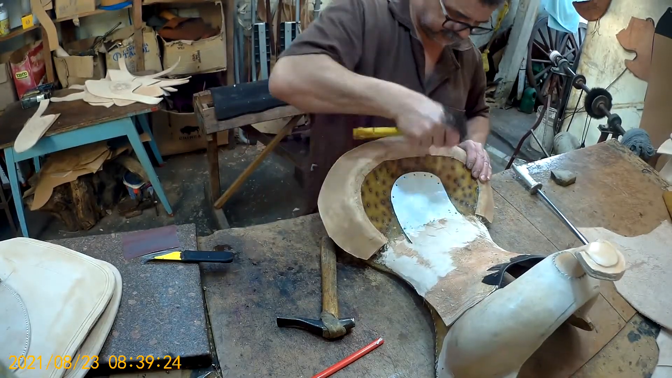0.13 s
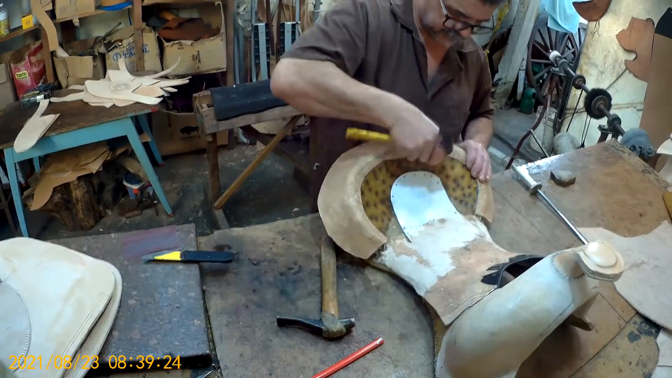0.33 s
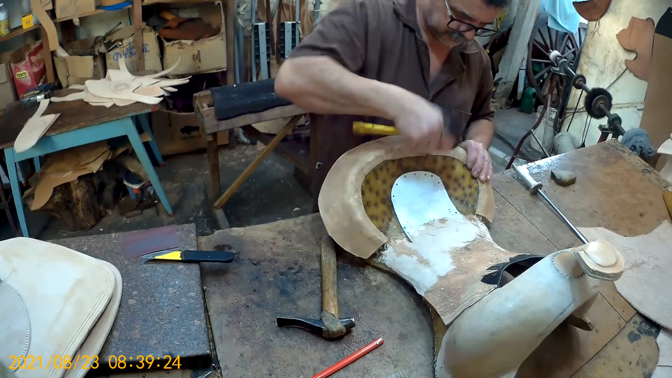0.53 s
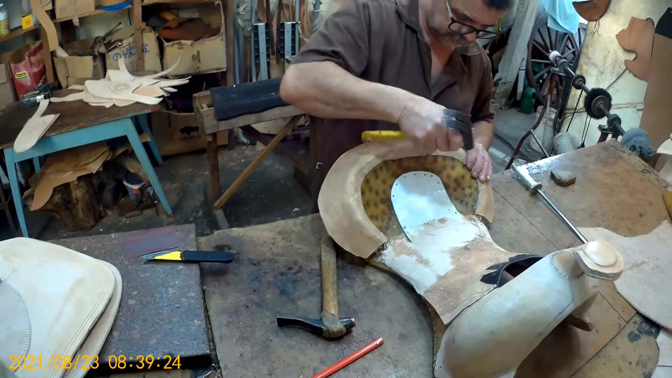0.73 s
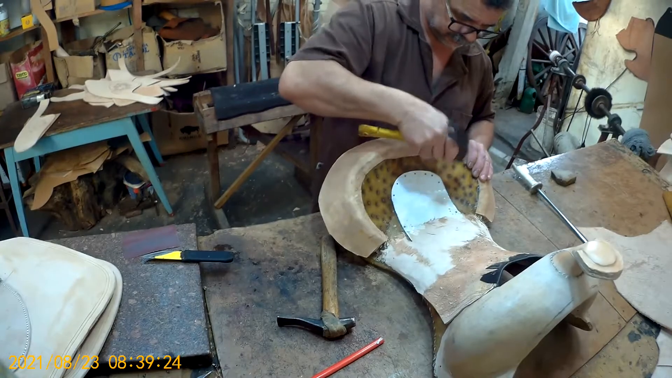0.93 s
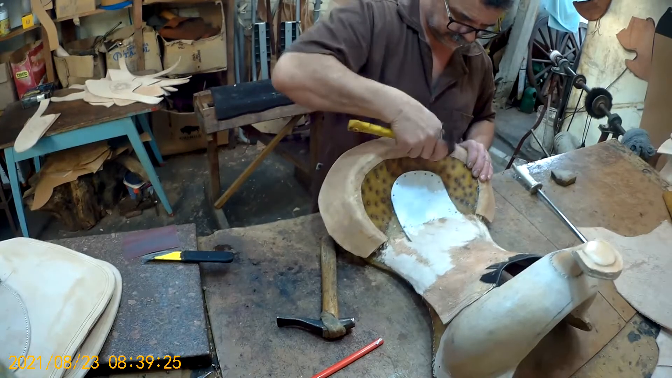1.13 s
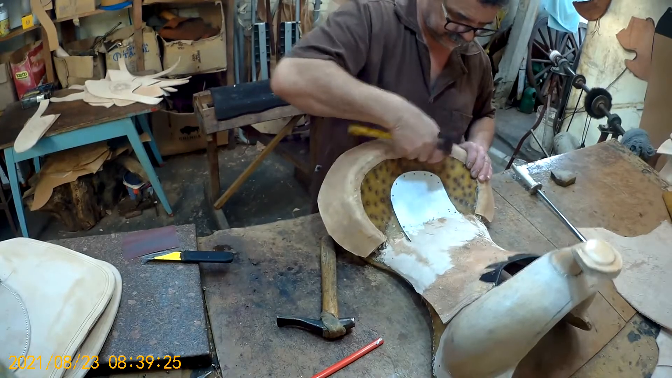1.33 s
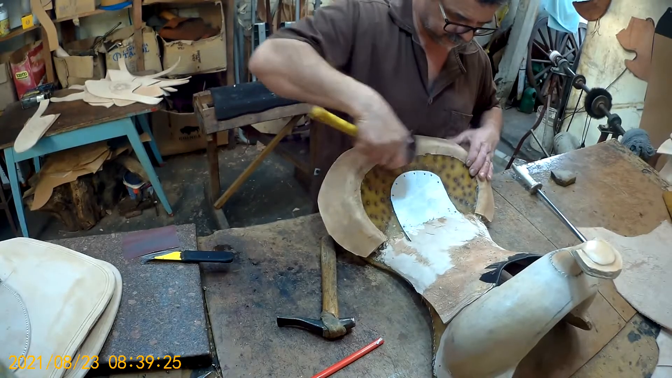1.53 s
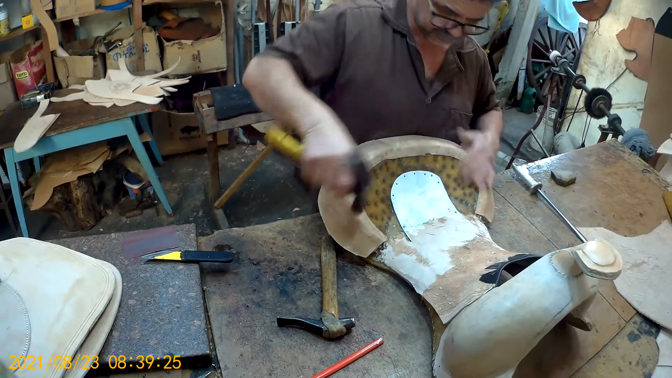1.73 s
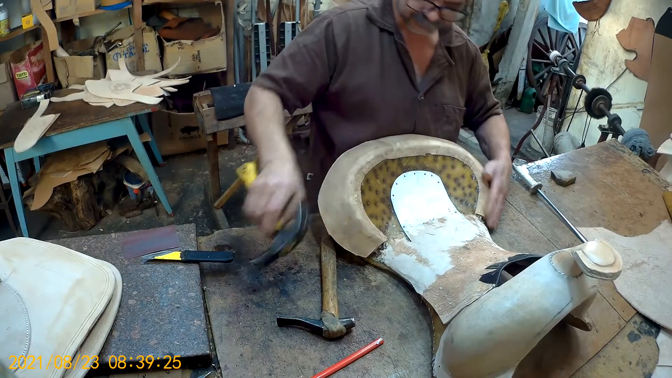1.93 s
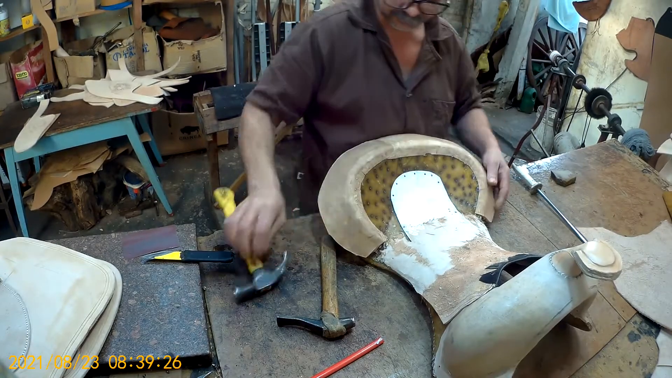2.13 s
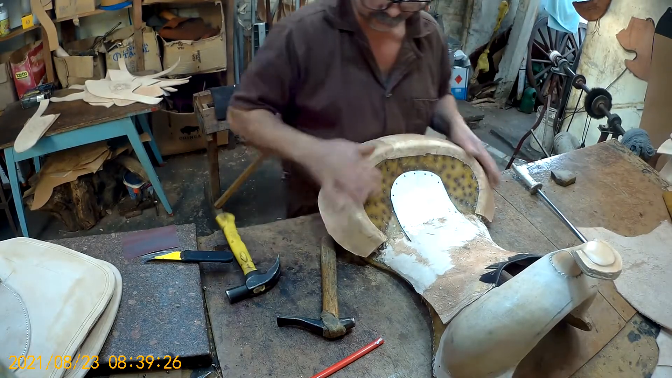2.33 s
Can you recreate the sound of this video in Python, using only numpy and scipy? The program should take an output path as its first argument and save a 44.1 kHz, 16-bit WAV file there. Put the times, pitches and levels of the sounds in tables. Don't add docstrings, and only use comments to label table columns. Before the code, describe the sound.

A small steel hammer gives five hard, woody knocks on a leather-covered saddle, scrapes off the rim, then after a brief cloth rustle drops and rattles on a workbench; small workshop, close overloaded microphone.

```python
import sys
import numpy as np
from scipy import signal
from scipy.fft import rfft, irfft
from scipy.io import wavfile
from scipy.ndimage import uniform_filter1d, minimum_filter1d

SR = 44100
rng = np.random.default_rng(int(sys.argv[2]) if len(sys.argv) > 2 else 0)


def how_loud(loudness_db):
    steps = np.asarray(loudness_db, float) / 20
    return 10 ** steps


def store_wav(level_fs):
    pcm = np.round(np.clip(np.atleast_2d(level_fs), -1, 1) * 32767)
    wavfile.write(sys.argv[1], SR, pcm.T.astype(np.int16))


N = 110250

# frequency in Hz, density in dB per Hz.
AIR_SPECTRUM = [(15, -50), (25, -4), (70, -4.5), (223, -5.5), (301, -8), (344, -7), (2480, -19.5),
                (13200, -31), (16000, -33)]
# start in seconds, peak in dB, thump in dB, brightness in dB,
# pitch factor of the steel.
BLOWS = [
    (0.2067, 2, 1.5, 6, 1.25),
    (0.4841, 2.5, 1, 4, 1.2),
    (0.7334, 1, 2, 8.5, 1.04),
    (0.9757, 1.5, -2.5, 7, 1.04),
    (1.223, 1, -0.5, -0.5, 1.3),
]
# frequency in Hz, level in dB, t60 in seconds, rise in seconds.
SADDLE_MODES = [(51, -13, 0.44, .05), (76.5, -13.5, 0.55, 0.019), (115.8, 6.5, 0.28, 0.02),
                (127, 4.5, 0.14, 0.043), (248.5, 14.5, 0.072, 0.013), (394.5, 7, 0.1, 0.00062),
                (503, -2.5, 0.13, 0.0026), (689.1, 10.5, 0.13, 0.0056), (730.4, 10, 0.13, 0.0017),
                (799, -1, 0.18, 0.0045), (917.4, 32, 0.0074, 0.001), (1006, -11, 0.43, 0.0034),
                (1477, 7, 0.02, 0.00046), (1825, -8, 0.033, 0.0019)]
SADDLE_SWING = [1, 1, 1, 1, 1, 1, -1, 1, 1, -1, 1, 1, 1, 1]
# frequency in Hz, density in dB per Hz.
SADDLE_TAIL = [(30, -15), (60, -2.5), (110, -4), (190, -8), (270, -6), (450, -7.5), (590, -15), (720, -8.5),
               (1300, -19.5), (2100, -29.5), (6000, -46), (12000, -75)]
# frequency in Hz, density in dB per Hz.
STEEL_SPECTRUM = [(1150, -22), (2820, 6), (3200, 5), (4550, 3), (5300, -10), (6500, -5.5), (8300, -7),
                  (16000, -46)]
# frequency in Hz, t60 in seconds.
ROOM_DECAY = [(50, 0.13), (160, 0.36), (420, 0.37), (1100, 0.48), (2000, 0.3), (3500, 0.17), (8000, 0.11)]
# frequency in Hz, level in dB, t60 in seconds,
# rise in seconds.
RETURN_MODES = [(710, -1, 0.13, 0.021), (687, -13.5, 0.089, .03)]
# time in seconds, level in dB.
SLEEVE_MOVES = [(1.4, -89), (1.5, -45), (1.56, -43), (1.62, -55), (1.66, -47), (1.72, -39), (1.8, -44),
                (1.87, -49.5), (2.0, -58), (2.25, -38.5), (2.349, -38.5), (2.5, -47.5)]
# frequency in Hz, density in dB per Hz.
CLOTH_SPECTRUM = [(300, -26), (1000, 12.5), (2500, 9), (4200, 5.5), (5500, -28), (6800, 1), (8300, -6.5),
                  (15000, -14)]
# time in seconds, level in dB.
PALM_SLIDES = [(1.44, -80), (1.48, -58), (1.555, -53), (1.6, -72), (1.68, -54), (1.76, -69), (1.9, -88),
               (2.02, -45), (2.1, -68)]
# start in seconds, peak in dB.
SKIPS = [(1.472, 3.5), (1.479, -7), (1.488, -6), (1.495, -6), (1.501, -1), (1.511, -1.5), (1.515, -3),
         (1.524, -12), (1.532, -12), (1.5366, -1), (1.548, -10), (1.555, -13), (1.567, -15), (1.981, -16)]
# frequency in Hz, level in dB, t60 in seconds, rise in seconds.
RIM_MODES = [(110.8, -18, 0.36, 0.019), (316, -44, 0.11, 0.0028), (502, 4, 0.013, 0.0011),
             (977, -15.5, 0.17, 0.00052), (1098, -2, 0.032, 0.00054), (1336, -4.5, 0.016, 0.00064),
             (2230, -27, 0.09, 0.00072)]
# start in seconds, length in seconds, level in dB, fade in dB.
DRAGS = [
    (1.473, 0.091, -23, -7),
    (2, 0.049, -11, -10),
]
# frequency in Hz, density in dB per Hz.
SCUFF_SPECTRUM = [(60, 0), (300, 8.5), (600, 7), (1000, -7), (1500, -2.5), (2300, -20.5), (3500, -39),
                  (12000, -27.5)]
# start in seconds, peak in dB, thump in dB, brightness in dB,
# pitch factor of the spot.
DROPS = [
    (1.993, 1, 10, -1.5, 0.82),
    (2.0755, 6.5, 17, 5.5, 1.004),
    (2.0925, 9.5, 1, 7, 1.015),
    (2.1378, -0.5, 1, -25, 1.2),
    (2.1418, -1.5, -19, -27, 1.65),
    (2.152, 8, 13.5, 5, 1.02),
    (2.194, 3, 4, -0.5, 1.05),
    (2.296, -4.5, -6, -4, 1.1),
    (2.372, -16, 8, -3, 1.16),
]
# frequency in Hz, level in dB, t60 in seconds, rise in seconds.
BENCH_MODES = [(150, -1, 0.043, 0.0044), (273.4, -4, 0.15, 0.0078), (347, 5.5, 0.05, 0.0021),
               (452.5, -11, 0.16, 0.0062), (556, 4.5, 0.038, 0.0017), (674, 7, 0.05, 0.0019),
               (769, 6.5, 0.039, 0.00064), (823, -5, 0.082, 0.00071), (837, 15, 0.02, 0.00052),
               (1006, -1.5, 0.11, 0.001), (1146, 6, 0.031, 0.0006), (1375, 10, 0.021, 0.00052),
               (2414, 1, 0.012, 0.00051), (3850, -4.5, 0.0079, 0.00032)]
# frequency in Hz, density in dB per Hz.
BENCH_TAIL = [(18, -46), (30, -18), (333, -5), (407, -17), (930, -8.5), (1030, -9.5), (2800, -26),
              (6740, -38.5), (12000, -47), (15600, -63), (22000, -120)]
# start in seconds, level in dB, thump in dB.
LANDINGS = [
    (1.993, -0.5, 18),
    (2.154, -9, 16),
]
# frequency in Hz, level in dB, t60 in seconds, rise in seconds.
LANDING_MODES = [(338.2, 2.5, 0.094, .008), (527, 7.5, 0.032, 0.00073), (670, 9.5, 0.026, 0.0017),
                 (866, -6.5, 0.25, 0.005), (1030, -2, 0.19, 0.0038), (1146, -6, 0.34, 0.018),
                 (1222, -1, 0.11, 0.002)]
# start in seconds, length in seconds, lower edge in Hz, loss in dB.
TREBLE_LOSSES = [(.2, .033, 8700, -15), (.458, .06, 8700, -15), (.471, .011, 1800, -20),
                 (.712, .026, 8700, -15), (.955, .045, 8700, -15), (1.193, .045, 8700, -15),
                 (1.268, .016, 4500, -12), (1.448, .028, 8700, -35), (1.477, .011, 3900, -25),
                 (1.587, .027, 4300, -25), (1.757, .011, 5500, -16), (1.99, .095, 8700, -35),
                 (2.032, .014, 3500, -14), (2.15, .032, 8700, -28), (2.278, .032, 8700, -35),
                 (2.374, .012, 4300, -15)]

DETUNE = 0.0044


def evened(x):
    return x / np.sqrt(np.mean(x ** 2) + 1e-20)


def read(points, hz):
    f, value = np.transpose(points)
    return np.interp(np.log(hz + 1), np.log(f + 1), value)


def add(mix, s, sound):
    part = mix[round(s * SR):][:len(sound)]
    part += sound[:len(part)]


def coloured(x, spectrum):
    hz = np.fft.rfftfreq(len(x), 1 / SR)
    return irfft(rfft(x) * how_loud(read(spectrum, hz)), len(x))


def slow_noise(length, smooth):
    return evened(uniform_filter1d(rng.standard_normal(length), size=smooth))


def air():
    level_db = -40 + 0.63 * slow_noise(N, 3000)
    return how_loud(level_db) * evened(coloured(rng.standard_normal(N), AIR_SPECTRUM))


def swell_before_blows():
    out = np.zeros(N)
    length_s, level_db, hz = 0.006, -31, 900
    t = np.arange(0, length_s, 1 / SR)
    swell_spectrum = [(hz / 2, -15), (hz, 0), (hz * 2, -12), (16000, -50)]
    for s, *_ in BLOWS:
        swell = evened(coloured(rng.standard_normal(SR // 10), swell_spectrum))
        add(out, s - length_s, how_loud(level_db) * swell[:len(t)] * t / length_s)
    return out


def ring(modes, low_db, bright_db, detune, pitch, swing=1, muffle_db=0):
    t = np.arange(SR // 2) / SR
    hz, db, t60, rise = np.transpose(modes)[:, :, None]
    hz = hz * pitch * (1 + detune * rng.standard_normal(hz.shape))
    db = db + read([(150, low_db), (500, 0), (1200, 0), (2500, bright_db)], hz)
    settled = np.clip((t - 0.036) / 0.005, 0, 1)
    db = db + muffle_db * (hz > 600) * settled
    envelope = how_loud(db - 60 * t / t60) * (1 - np.exp(-t / rise))
    return (np.reshape(swing, (-1, 1)) * envelope * np.sin(2 * np.pi * hz * t)).sum(0) / 3


def tail(noise, spectrum, rise_s):
    frame = dict(nperseg=512, noverlap=384)
    hz, t, z = signal.stft(evened(coloured(noise, spectrum)), SR, **frame)
    decay = how_loud(-60 * t / read(ROOM_DECAY, hz)[:, None])
    x = signal.istft(z * decay, SR, **frame)[1][:len(noise)]
    return x * (1 - np.exp(-np.arange(len(x)) / SR / rise_s))


def crack(bright_db, pitch):
    t = np.arange(SR // 2) / SR
    decay_s, rise_s = 0.0017, 0.0014
    spectrum = [(hz * pitch, db) for hz, db in STEEL_SPECTRUM]
    noise = evened(coloured(rng.standard_normal(len(t)), spectrum))
    return how_loud(-9 + bright_db) * noise * np.exp(-t / decay_s) * (1 - np.exp(-t / rise_s))


def impacts(rows, modes, spectrum, level_db, tail_db, rise_s, detune, crack_db, saddle=False):
    out = np.zeros(N)
    shared = rng.standard_normal(SR // 2)
    same = 1
    lead_s, lead_db = 0.00042, -17
    lead = -how_loud(lead_db) * np.sin(np.pi * np.arange(0, lead_s, 1 / SR) / lead_s) ** 2
    for s, db, low_db, bright_db, pitch in rows:
        noise = same * shared + np.sqrt(1 - same ** 2) * rng.standard_normal(SR // 2)
        if saddle:
            body = ring(modes, low_db, bright_db, detune, 1, SADDLE_SWING, muffle_db=-8)
        else:
            body = ring(modes, low_db, bright_db, detune, pitch)
        diffuse = how_loud(tail_db) * tail(noise, spectrum, rise_s)
        level = how_loud(db + level_db)
        add(out, s, level * (body + diffuse + crack(bright_db + crack_db, pitch)))
        add(out, s - lead_s, level * lead)
    return out


def saddle_blows():
    return impacts(BLOWS, SADDLE_MODES, SADDLE_TAIL, level_db=4.5, tail_db=-9, rise_s=0.00082,
                   detune=DETUNE, crack_db=0, saddle=True)


def returning_knock():
    out = np.zeros(N)
    for s, db, *_ in BLOWS:
        add(out, s + 0.085, how_loud(db) * ring(RETURN_MODES, 0, 0, DETUNE, 1))
    return out


def sleeve():
    level_db = np.interp(np.arange(N) / SR, *np.transpose(SLEEVE_MOVES))
    grains = how_loud(2.1 * slow_noise(N, 300)) * rng.standard_normal(N)
    return how_loud(level_db) * evened(coloured(grains, CLOTH_SPECTRUM))


def palm():
    centre_hz, width_hz = 6800, 720
    band = [(centre_hz - 2 * width_hz, -40), (centre_hz, 0), (centre_hz + 2 * width_hz, -40)]
    level_db = np.interp(np.arange(N) / SR, *np.transpose(PALM_SLIDES))
    patches_db = 6.1 * slow_noise(N, 700)
    return how_loud(level_db + patches_db) * evened(coloured(rng.standard_normal(N), band))


def rim_skips():
    rows = [(s, db, 0, 0, 1) for s, db in SKIPS]
    return impacts(rows, RIM_MODES, BENCH_TAIL, level_db=-1.5, tail_db=-32, rise_s=0.0032,
                   detune=0.028, crack_db=-42)


def drag():
    out = np.zeros(N)
    for s, length, level_db, fade_db in DRAGS:
        t = np.arange(0, length, 1 / SR)
        slips = rng.standard_normal(SR // 4) * how_loud(2.2 * slow_noise(SR // 4, 120))
        edges = np.clip(np.minimum(t / 0.003, (t[-1] - t) / 0.01), 0, 1)
        shape = edges * how_loud(level_db + fade_db * t / t[-1])
        add(out, s, shape * evened(coloured(slips, SCUFF_SPECTRUM))[:len(t)])
    return out


def bench_drops():
    return impacts(DROPS, BENCH_MODES, BENCH_TAIL, level_db=-3, tail_db=-14, rise_s=0.00066,
                   detune=0.037, crack_db=-2.1)


def flat_landings():
    out = np.zeros(N)
    for s, db, low_db in LANDINGS:
        add(out, s, how_loud(db) * ring(LANDING_MODES, low_db, 0, 0, 0.94))
    return out


def scene():
    hammer = saddle_blows() + bench_drops() + rim_skips() + drag()
    background = air() + sleeve()
    details = returning_knock() + swell_before_blows() + flat_landings() + palm()
    return (hammer + background + details)[None]


def lose_treble(x):
    frame = dict(nperseg=256, noverlap=192)
    top_hz = 15600
    hz, t, z = signal.stft(x, SR, **frame)
    for s, length, above_hz, loss_db in TREBLE_LOSSES:
        z = z * how_loud(loss_db * np.outer(hz > above_hz, (t > s) & (t < s + length)))
    return signal.istft(z * (hz < top_hz)[:, None], SR, **frame)[1][:, :N]


def top_cut(x):
    return signal.sosfilt(signal.butter(12, 16290, fs=SR, output="sos"), x)


def record(dry):
    duck_from_db, duck_share, recover_db_per_s, ceiling = -11, 0.31, 116, 0.92
    power = uniform_filter1d(dry[0] ** 2, size=400, origin=199)
    power_db = 10 * np.log10(abs(power) + 1e-12)
    held_db = -minimum_filter1d(-power_db, size=4000, origin=1999)
    fall = np.arange(N) * recover_db_per_s / SR
    falling_db = np.maximum.accumulate(held_db + fall) - fall
    over_db = np.maximum(falling_db - duck_from_db, 0)
    ducked = dry / how_loud(duck_share * uniform_filter1d(over_db, size=600, origin=299))
    mix = lose_treble(np.clip(ducked, -ceiling, ceiling))
    return top_cut(mix)


dry = scene()
out = record(dry)
store_wav(out)
```